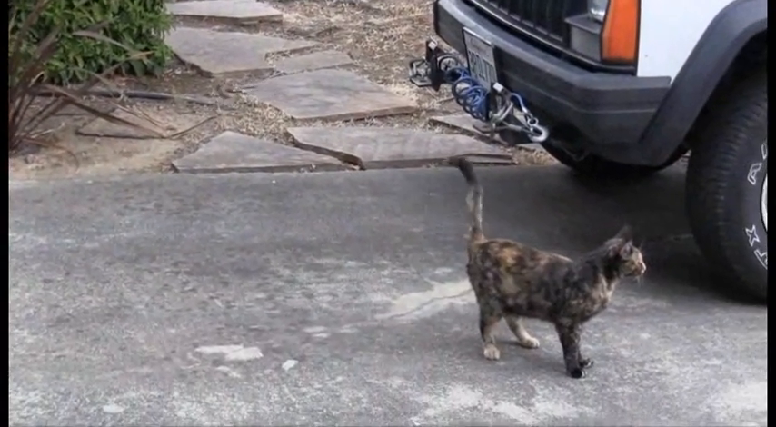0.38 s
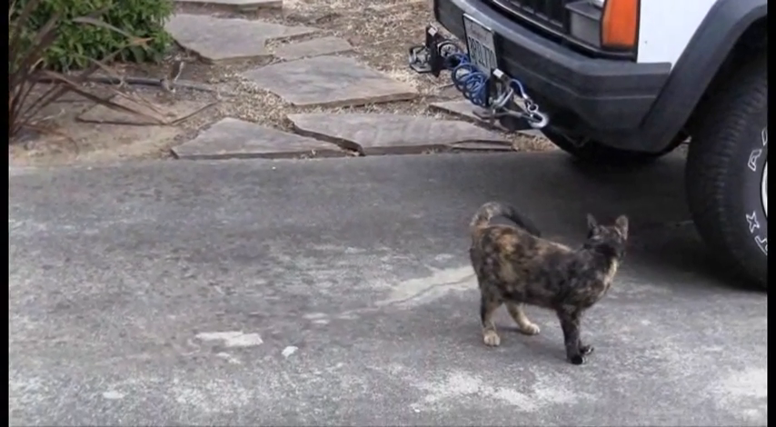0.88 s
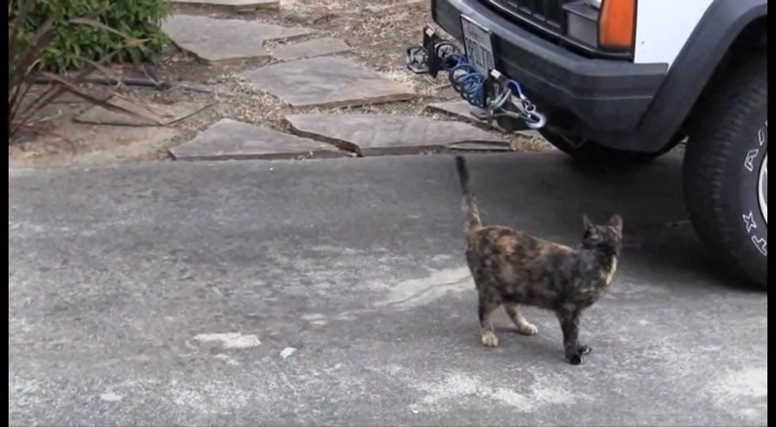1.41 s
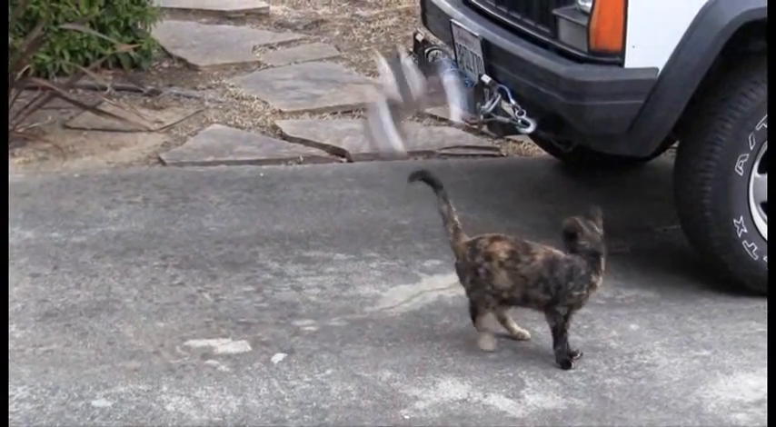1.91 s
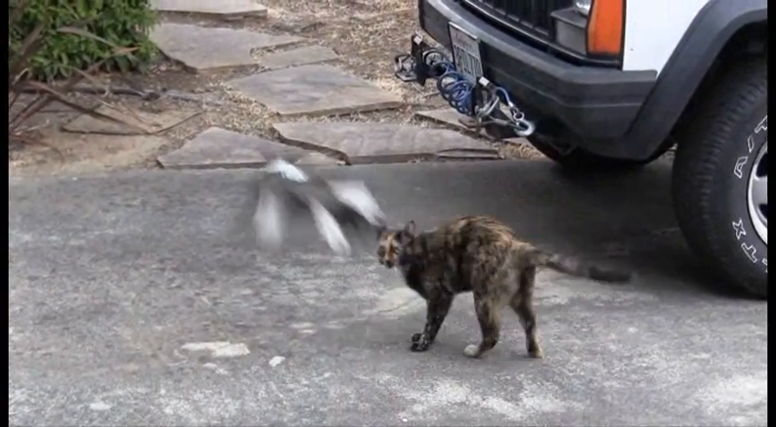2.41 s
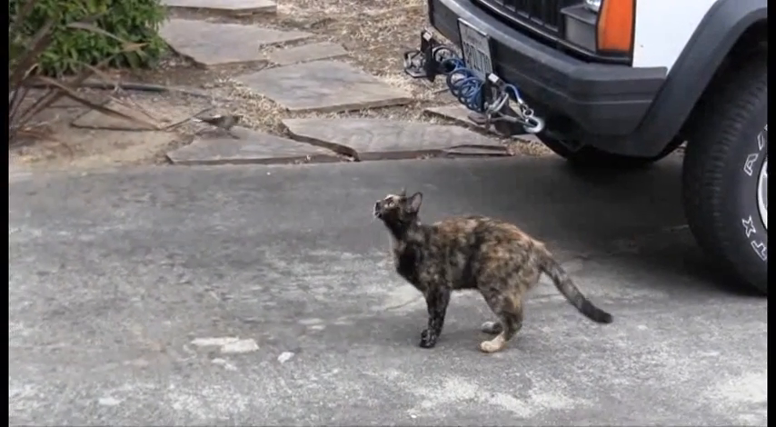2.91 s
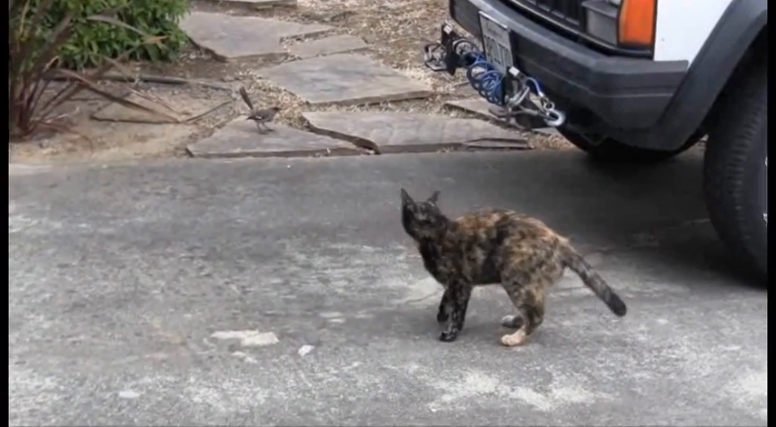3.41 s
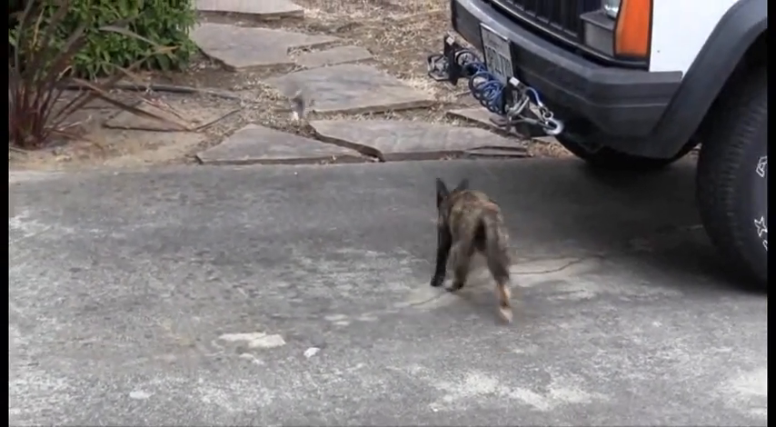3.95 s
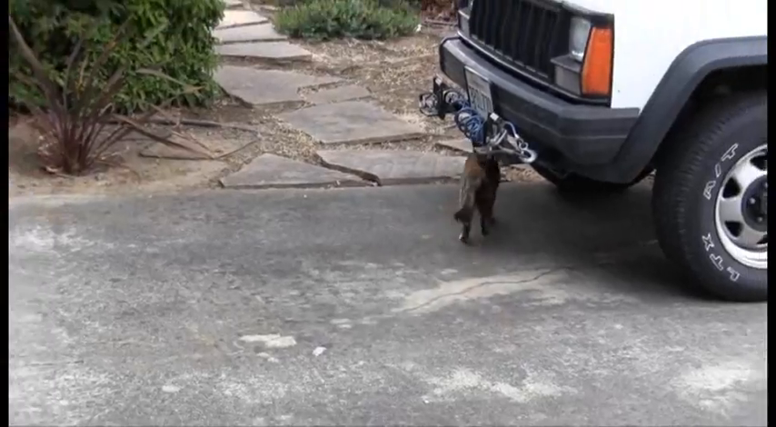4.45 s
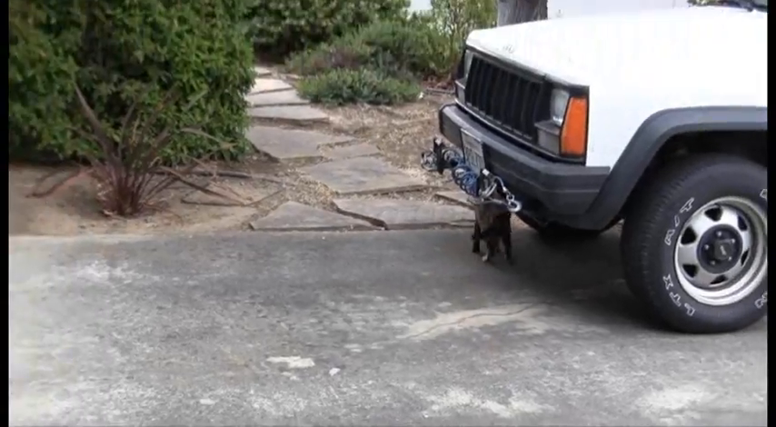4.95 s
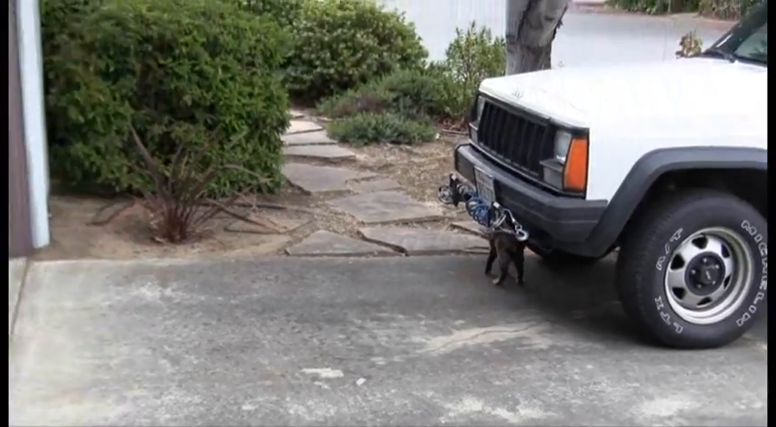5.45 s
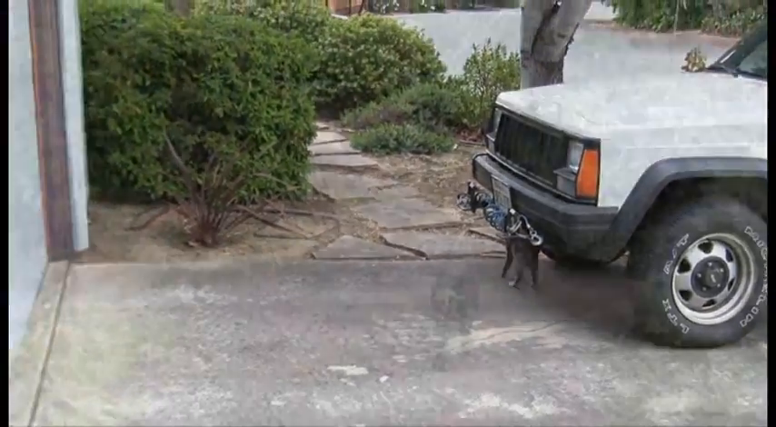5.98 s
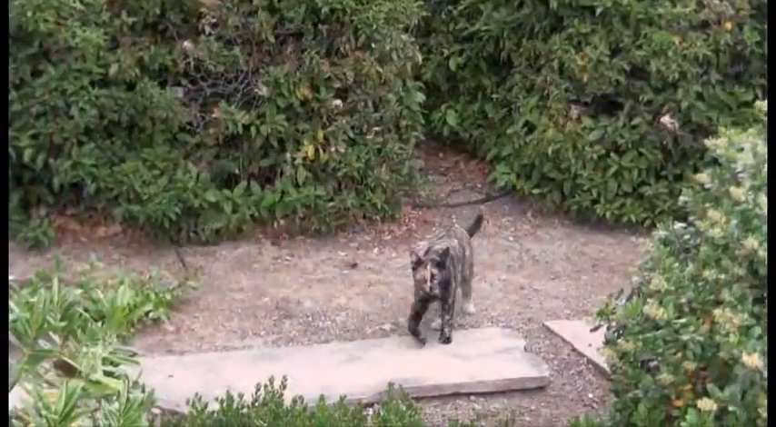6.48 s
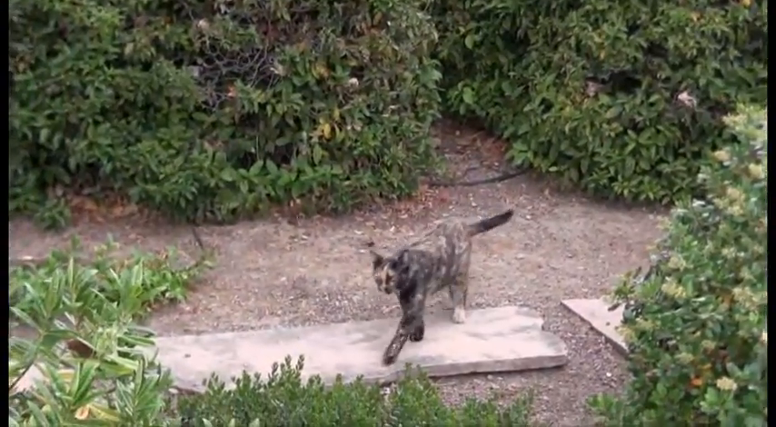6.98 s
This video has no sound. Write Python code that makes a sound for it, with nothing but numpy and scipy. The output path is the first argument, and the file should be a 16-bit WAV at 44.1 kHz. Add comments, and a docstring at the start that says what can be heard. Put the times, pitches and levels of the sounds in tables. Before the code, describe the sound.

Outdoors on a residential driveway, scolding mockingbirds give loud, dry, grating rasps, joined in a run at first, then a brief gap with soft wing flaps before sharper rasps resume. A trembling squeal drops in pitch midway, followed by more rasps that weaken. Distant traffic hums steadily; faint ticks occur, and low wind buffets the stereo microphone at the end. Hard surfaces give short, bright reflections.

```python
"""Harsh rasps of scolding mockingbirds follow and overlap over a far traffic hum; they scold a cat on
a paved drive. Uneven puffs and hiss ring four throat resonances; gliding sines lock inside the rasps.
Wing beats are puffs of noise, ticks are short rings, and one rasp opens with a falling whistled squeal.
Random taps make the echoes of paving, a car body and walls; at the end low noise buffets the two
microphone ports as a gust."""
import sys
import numpy as np
from scipy import signal
from scipy.fft import next_fast_len
from scipy.io import wavfile
from scipy.ndimage import uniform_filter1d

SR = 44100
rng = np.random.default_rng(int(sys.argv[2]) if len(sys.argv) > 2 else 0)


def convert_level_to_amplitude(level_db):
    """Map a level in decibels to its linear amplitude factor."""
    exponent = np.asarray(level_db, float) / 20
    return 10 ** exponent


def inscribe(sig):
    """Save sig as 16-bit PCM at rate SR to the path in sys.argv[1].

    A 1-D sig is mono; a 2-D sig holds one channel per row.
    Samples are clipped to [-1, 1] before scaling.
    """
    pcm = np.round(np.clip(np.atleast_2d(sig).T, -1, 1) * 32767)
    wavfile.write(sys.argv[1], SR, pcm.astype(np.int16))


N = 313551  # length of the scene in samples


def evened(x):
    """Scales a sound to rms 1."""
    return x / np.sqrt(np.mean(x ** 2) + 1e-20)


def read(points, hz):
    """Reads a spectrum table on a log-frequency axis."""
    f, value = np.transpose(points)
    return np.interp(np.log(hz + 1), np.log(f + 1), value)


def add(mix, s, sound):
    """Mixes a sound in at time s, in seconds."""
    part = mix[round(s * SR):][:len(sound)]
    part += sound[:len(part)]


def wander(length, samples):
    """Random wobble of rms 1, smoothed over so many samples."""
    return evened(uniform_filter1d(rng.standard_normal(length), max(int(samples), 1)))


def resonate(x, hz, width_hz, order=2):
    """A moving resonance: shifts the curve hz to zero, smooths, shifts back."""
    turn = np.exp(2j * np.pi * np.cumsum(hz * np.ones(len(x))) / SR)
    r = np.exp(-np.pi * width_hz / SR)
    low = x / turn
    for _ in range(order):
        low = signal.lfilter([1 - r], [1, -r], low)
    return 2 * (turn * low).real


def dulled(x, top_hz):
    """Takes away the treble above top_hz."""
    return signal.sosfilt(signal.butter(3, top_hz, fs=SR, output="sos"), x)


def without_bass(x, order, bottom_hz):
    """Takes away the bass below bottom_hz."""
    return signal.sosfilt(signal.butter(order, bottom_hz, "high", fs=SR, output="sos"), x)


def shaped_noise(gain, size):
    """Noise from random short-time spectra; gain(hz, s) gives the magnitudes."""
    hop = size // 4
    frames = N // hop + 5
    a, b = rng.standard_normal((frames, size // 2 + 1, 2)).T
    hz = np.fft.rfftfreq(size, 1 / SR)[:, None]
    s = (np.arange(frames) * hop / SR)[None]
    spectra = (a + 1j * b) * gain(hz, s)
    return signal.istft(spectra, nperseg=size, noverlap=size - hop)[1][:N]


def swell(start, end, from_hz, to_hz, peak_db):
    """Time, gliding frequency and arched gain of a passing band."""
    t = np.arange(start, end, 1 / SR)
    u = np.linspace(0, 1, len(t))
    arch_db = -9.5 * (2 * u - 1) ** 2  # weaker toward both ends, which also fade to silence
    gain = convert_level_to_amplitude(peak_db + arch_db) * signal.windows.tukey(len(t), .15)
    return t, from_hz + (to_hz - from_hz) * u, gain


# The colour of the hum. Each row: frequency in Hz, relative level in dB.
HUM_COLOUR = [(15, -50), (25, -55), (70, -1.5), (344, -2), (373, -5.5), (734, -7), (1840, -10), (2160, -14),
              (3520, -16.5), (4140, -21.5), (16000, -35.5)]
# How wide the hum is. Each row: frequency in Hz, level of the side against the middle in dB.
HUM_WIDTH = [(40, -28), (90, -39), (180, -10), (550, -11), (1650, -13.5), (5000, -7.5), (15000, -4)]
# How the hum comes and goes. Each row: time in seconds, relative level in dB.
HUM_DRIFT = [(0, 4.6), (5.5, 5), (6.3, 6.5), (7.2, 3.6)]


def hum():
    """Far traffic and air: smooth noise, narrow in the deepest bass and a little stronger at left."""
    def middle_gain(hz, s):
        return convert_level_to_amplitude(read(HUM_COLOUR, hz) + np.interp(s, *np.transpose(HUM_DRIFT)))

    def side_gain(hz, s):
        return middle_gain(hz, s) * convert_level_to_amplitude(read(HUM_WIDTH, hz))

    mid, side = shaped_noise(middle_gain, 2048), shaped_noise(side_gain, 2048)
    level = convert_level_to_amplitude(-47.5) / mid.std()
    return level * np.array([mid + side, mid - side]) * convert_level_to_amplitude(np.array([[.6], [-.6]]))


def syrinx_drive(turns):
    """The voice organ snaps shut about a thousand times a second; hiss weakens from snap to snap."""
    n = len(turns)
    # each closure comes a little early or late
    uneven_turns = np.floor(turns + .035 * wander(n, 30))
    snaps = np.diff(np.maximum.accumulate(uneven_turns), prepend=0) > 0
    strong_weak = 1 + 0.42 * np.cos(np.pi * np.cumsum(snaps))  # alternate closures give half-pitch lines
    snaps = snaps * strong_weak * convert_level_to_amplitude(2.0 * rng.standard_normal(n))
    # hiss is strongest just after each snap and weakens until the next
    hiss = (0.29 + np.exp(-(turns % 1) / 1.55)) * rng.standard_normal(n)
    blend = .55 * evened(snaps - snaps.mean()) + .65 * evened(hiss)
    return blend * convert_level_to_amplitude(1.2 * wander(n, 250))


# Widths in Hz of the low, main, upper and top throat resonance.
THROAT_WIDTHS_HZ = (1000, 1020, 1570, 2600)
# Each of the four resonances falls away above its own limit, in Hz.
THROAT_LIMITS_HZ = (4050, 6900, 9850, 14600)


def throat_ring(drive, centres_hz, levels_db):
    """Four resonances ring side by side, and a side cavity swallows one band."""
    throat = 0
    bands = zip(centres_hz, THROAT_WIDTHS_HZ, levels_db, THROAT_LIMITS_HZ)
    for k, (hz, width_hz, db, limit_hz) in enumerate(bands):
        ring = dulled(resonate(drive, hz, width_hz, order=1 + k // 3), limit_hz)
        # neighbours alternate in sign, as in a tube, so the gaps between them stay filled
        throat = throat + (-1) ** k * convert_level_to_amplitude(db) * evened(ring)
    return throat - 0.48 * resonate(throat, 3715, 500, order=1)


def strands(drive, centres_hz, levels_db):
    """Narrow strands flare and fade inside the low, main and upper resonance."""
    n, out = len(drive), 0
    for centre_hz, db, trim_db in zip(centres_hz, levels_db, (-11.5, -9.5, -10.5)):
        for shift_hz in (-350, 0, 380):
            line = resonate(drive, centre_hz + shift_hz + 90 * wander(n, 2380), 115)
            out = out + convert_level_to_amplitude(db + trim_db + 2.9 * wander(n, 900)) * evened(line)
    return out


def syrinx_tone(drive, turns, pitch, tone_db, ragged):
    """The hum of the voice organ itself, which slips out of step and grows fuzz when ragged."""
    n = len(turns)
    slip = np.cumsum(.06 * ragged * wander(n, 200) * pitch) / SR
    flicker_db = (1.5 + 2.5 * ragged) * wander(n, 400)
    tone = np.sin(2 * np.pi * (turns + slip)) * convert_level_to_amplitude(tone_db + flicker_db)
    fuzz = evened(resonate(drive, 1.45 * pitch, 510))  # nearly half a pitch above the tone
    return tone + convert_level_to_amplitude(tone_db - 6.5 + 8.2 * ragged) * fuzz


def rasp(rows, tone_against_effort_db, low_from_hz, low_to_hz, low_db, upper_hz, ragged):
    """One stretch of scolding: a chaotic voice organ rings the throat and adds its own tone."""
    attack_s, release_s = .014, .016
    s, *columns = np.transpose(rows)
    t = np.arange(s[0], s[-1] + release_s / 2, 1 / SR)
    effort_db, pitch, main_hz, top_db = (np.interp(t, s, c) for c in columns)

    low_hz = np.linspace(low_from_hz, low_to_hz, len(t))
    low_db = low_db + 4.5 * np.exp(-(t - s[0]) / 0.012)  # the low resonance speaks first
    upper_hz = upper_hz + low_hz - low_hz.mean()  # the upper one moves along with the low one
    upper_db = -1 + 0.59 * np.maximum(top_db, -32)  # and takes a share of the brightness
    centres_hz = (low_hz, main_hz, upper_hz, 1.623 * upper_hz)
    levels_db = (low_db, 0, upper_db, top_db)

    turns = np.cumsum(pitch * (1 + .02 * wander(len(t), 150))) / SR
    drive = syrinx_drive(turns)
    throat = throat_ring(drive, centres_hz, levels_db)
    throat = without_bass(throat, 4, 1.91 * np.median(pitch))  # a small body radiates little bass
    throat = throat + strands(drive, centres_hz[:3], levels_db[:3])

    # the tone gives out toward the end of a stretch
    fade_db = -5 * ((t - s[0]) / (s[-1] - s[0])) ** 4
    tone = syrinx_tone(drive, turns, pitch, effort_db + tone_against_effort_db + fade_db, ragged)
    octave_db = effort_db + low_db - 20 + 5.6 * wander(len(t), 205.4)
    octave = np.sin(4 * np.pi * turns) * convert_level_to_amplitude(octave_db)

    edge = np.minimum((t - s[0]) / attack_s, (t[-1] - t) / release_s)
    edge = np.clip(edge, 0, 1) ** .7
    return s[0], edge * (convert_level_to_amplitude(effort_db - 2.5) * throat + np.sqrt(2) * (tone + octave))


# One curve for each stretch of scolding; neighbouring stretches often join where the rasp changes
# abruptly. Each row: time in seconds, effort in dB, pitch of the voice organ in Hz, main throat
# resonance in Hz, brightness in dB (higher when the beak points at the microphone).
STRETCHES = [
    [(0.072, -24, 1000, 4500, -25), (0.084, -29, 967, 4840, -24), (0.232, -27.5, 944, 4550, -20),
     (0.332, -25, 1024, 4570, -18)],
    [(0.326, -25, 1030, 5000, -14), (0.378, -22, 1007, 4700, -15), (0.55, -23.5, 1020, 4880, -11),
     (0.703, -27, 1007, 5310, -10)],
    [(0.697, -28, 996, 5080, -14), (0.769, -25.5, 994, 5150, -11.5), (0.929, -27, 881, 5010, -13),
     (0.973, -27, 832, 5200, -18)],
    [(0.967, -25.5, 899, 4860, -15), (1.001, -25, 987, 4930, -15), (1.09, -24, 956, 4900, -17.5)],
    [(1.084, -28.5, 944, 4440, -23), (1.246, -26, 1040, 4790, -14.5), (1.366, -24.5, 991, 4670, -14.5),
     (1.452, -28, 944, 4720, -18)],
    [(2.025, -27.5, 964, 5520, -9), (2.061, -21, 929, 5480, -10), (2.11, -21.5, 850, 5560, -8.5),
     (2.165, -25, 833.4, 5680, -9.5), (2.269, -24.5, 969, 4630, -14), (2.313, -24.5, 878, 4500, -19),
     (2.385, -23, 901, 4560, -21)],
    [(2.696, -32, 1304, 4940, -2), (2.716, -22.5, 1243, 4940, -7.5), (2.868, -22, 1155, 4930, -7),
     (2.902, -21.5, 1072, 4980, -8), (3.22, -23.5, 889.4, 4690, -17.5), (3.35, -23.5, 850, 4687, -21.5)],
    [(3.899, -30, 969, 4930, -14), (3.967, -27.5, 1053, 4960, -10.5), (4.143, -29.5, 977, 5120, -15.5),
     (4.17, -27.5, 1000, 5040, -12.5), (4.349, -28, 982.5, 4980, -15.5), (4.46, -36, 898, 5050, -14)],
    [(4.566, -33.5, 900, 5260, -6), (4.778, -27.5, 1043, 4530, -15), (4.9, -28, 1011, 4000, -14.5),
     (4.93, -33, 954, 4640, -9), (5.016, -32.5, 962, 5330, -14), (5.048, -42, 912, 4940, -8)],
    [(5.058, -33, 935, 4600, -22), (5.108, -30, 950, 4570, -20.5), (5.186, -24.5, 989, 4700, -18.5),
     (5.422, -24.5, 1008, 4820, -18), (5.536, -35.5, 904, 4980, -13), (5.612, -36.5, 934, 5150, -15)],
    [(5.62, -32, 979, 4800, -23), (5.654, -33.5, 940, 4640, -39), (5.746, -31.5, 974, 4360, -19.5),
     (5.894, -28.5, 953, 4740, -17), (6.158, -34, 800, 5084, -12)],
    [(6.152, -39, 1000, 4170, -30), (6.196, -37.5, 971, 4380, -44), (6.394, -35, 1023, 4560, -37),
     (6.48, -34.5, 1014, 4430, -25), (6.57, -35, 950, 4670, -33)],
]
# The throat and tone settings of each stretch. Each row: tone of the voice organ against the effort in
# dB, low resonance at the start in Hz, at the end in Hz, its level against the main one in dB, mean
# upper resonance in Hz.
VOICES = [(-18, 2300, 1500, -7, 6950), (-19, 2650, 2850, -5.5, 7750), (-20, 2320, 2620, -8.5, 7400),
          (-23, 2100, 2440, -5, 7480), (-24, 3000, 2400, -4.5, 7020), (-22, 2650, 2700, -5, 7200),
          (-23.5, 3250, 2430, -5.5, 7600), (-28, 2840, 2590, -3.5, 7400), (-33, 2710, 2750, -2, 7200),
          (-28.5, 2230, 2490, -4.5, 6850), (-25.5, 2580, 2790, -5, 6800), (-13.5, 2470, 2880, -5, 7400)]
# How far the tone of each stretch breaks up, from 0 (steady) to 1 (ragged).
RAGGED = [.15, .1, .15, .5, .5, .7, .8, .6, .6, .5, .5, .05]


def scolding():
    """All the rasps, stretch by stretch, each stretch with its own throat and tone settings."""
    out = np.zeros(N)
    for rows, voice, ragged in zip(STRETCHES, VOICES, RAGGED):
        add(out, *rasp(rows, *voice, ragged))
    return out


# Fuzzy partials that lock for a moment inside a rasp. Each row: start in seconds, end in seconds,
# first frequency in Hz, last frequency in Hz, level at the middle of the swell in dB.
LOCKED = [(0.08, .28, 1980, 2450, -33), (0.25, .43, 2500, 2580, -28), (0.2, .9, 1340, 1330, -47),
          (0.22, .5, 4420, 4520, -27.5), (0.36, .61, 3020, 3130, -33), (0.38, .59, 2200, 2180, -34),
          (0.97, 1.2, 2300, 2400, -33), (0.97, 1.4, 1980, 1960, -38), (1.18, 1.44, 2450, 2600, -32),
          (1.2, 1.45, 4800, 4720, -25), (1.1, 1.4, 4350, 4450, -29), (2.215, 2.25, 4750, 4470, -23),
          (2.262, 2.298, 4900, 4490, -23), (2.305, 2.34, 4750, 4560, -28), (2.348, 2.386, 4800, 4470, -23),
          (2.12, 2.2, 2700, 2720, -30), (2.06, 2.16, 5700, 6500, -27), (2.71, 2.95, 3500, 3350, -32),
          (2.74, 3.08, 3080, 2950, -31), (2.92, 3.34, 1980, 2050, -36), (2.95, 3.34, 2350, 2480, -33),
          (3.9, 4.1, 2890, 2930, -31), (5.07, 5.14, 2200, 2270, -34), (5.06, 5.4, 1930, 2000, -40),
          (5.62, 5.85, 1980, 1880, -44), (5.68, 6.05, 2200, 2520, -38), (2.05, 2.37, 1720, 1700, -38),
          (6.15, 6.55, 2330, 2600, -42), (6.14, 6.58, 1980, 2040, -46), (6.14, 6.58, 4380, 4450, -41)]


def locked_partials():
    """Near sines that glide while their pitch and strength shiver."""
    out = np.zeros(N)
    for row in LOCKED:
        t, hz, gain = swell(*row)
        turns = np.cumsum(hz * (1 + 0.025 * wander(len(t), 121))) / SR
        shiver = convert_level_to_amplitude(1.9 * wander(len(t), 289.5))
        add(out, row[0], np.sqrt(2) * gain * shiver * np.sin(2 * np.pi * turns))
    return out


def near_echoes(x):
    """Paving and car body return a short, dense cluster, a little different at each port."""
    t = np.arange(2600) / SR
    cluster = rng.standard_normal((3, len(t))) * convert_level_to_amplitude(-60 * t / 0.19) * (t > .002)
    # both ports share the first noise; each adds one of its own
    cluster = (cluster[0] + 0.59 * cluster[1:]) / np.linalg.norm(cluster[0])
    bright = without_bass(x, 2, 1600)  # small faces return little bass
    return signal.fftconvolve(bright[None], cluster, axes=1)[:, :N]


# How long the walls ring. Each row: frequency in Hz, time to fall by 60 dB in seconds.
WALLS = [(1000, 0.14), (3000, 0.88), (5000, 0.69), (9000, 0.65), (14000, 0.17)]


def walls(x):
    """Sparse taps of random sign, each band dying at its own speed."""
    taps = np.zeros((2, SR))
    at = np.arange(300, SR - 20, 20) + rng.integers(0, 20, (2, (SR - 301) // 20))
    np.put_along_axis(taps, at, rng.choice([-1., 1.], at.shape), 1)
    hz, t, z = signal.stft(taps, SR, nperseg=256)
    dying = convert_level_to_amplitude(-60 * t / read(WALLS, hz)[:, None])
    tail = signal.istft(z * dying, SR, nperseg=256)[1]
    return signal.fftconvolve(x[None], tail / np.linalg.norm(tail[0]), axes=1)[:, :N]


# Soft wing beats. Each row: start in seconds, relative level in dB, length in seconds.
WINGS = [(1.83, -58, 0.027), (1.982, -51.5, 0.052), (2.47, -51, .015), (2.523, -52.5, 0.042),
         (2.587, -76, .015), (2.61, -51.5, .025), (3.492, -52.5, 0.05)]


def wing_beats():
    """Feathers swish as bright puffs of noise."""
    out = np.zeros(N)
    for s, db, length_s in WINGS:
        bright = np.convolve(rng.standard_normal(4000), [1, -.6])
        puff = dulled(bright, 11000)[:round(length_s * SR)]
        add(out, s, convert_level_to_amplitude(db) * puff * signal.windows.tukey(len(puff), .4))
    return out


# Dull ticks nearby. Each row: start in seconds, relative level in dB, ring frequency in Hz.
TICKS = [(3.24, -26, 630), (3.858, -56, 826), (5.241, -15, 764), (6.841, -38, 1280)]


def ticks():
    """Two partials that die within a couple of cycles; their slope is what sounds."""
    out, t = np.zeros(N), np.arange(600) / SR
    for s, db, hz in TICKS:
        ring = np.sin(2 * np.pi * hz * t) + 0.46 * np.sin(2 * np.pi * 2.37 * hz * t)
        slope = np.gradient(ring * np.exp(-t * hz / 0.83)) * SR
        add(out, s, convert_level_to_amplitude(db) * slope / (2 * np.pi * 1.07 * hz))
    return out


# The strength of the squeal. Each row: time in seconds, effort in dB.
SQUEAL = [(4.503, -41), (4.543, -24), (4.561, -13.5), (4.571, -19), (4.665, -25.5), (4.68, -22.5),
          (4.8, -36), (4.9, -33.5), (4.95, -51)]
# What the throat lets through of each partial. Each row: frequency in Hz, gain in dB.
SQUEAL_THROAT = [(1000, -20.5), (1450, -9), (2100, -1), (2400, 2.5), (2750, 0.5), (3200, -10.5),
                 (4200, -16.5), (4500, -20)]
# The beak opens during the squeal and lifts a bright band. The one row: start in seconds, end in
# seconds, first frequency in Hz, last frequency in Hz, level at the middle of the swell in dB.
BEAK = (4.66, 4.96, 2400, 5400, -24)


def squeal():
    """A trembling whistle that climbs briefly, then sinks and grows less steady."""
    top_s, top_hz, rest_hz = 4.548, 2257, 940
    climb_hz, sink_s, rough = 282, .118, .29
    start = SQUEAL[0][0]
    t = np.arange(start, BEAK[1], 1 / SR)
    after = t - top_s
    sink = rest_hz + (top_hz - rest_hz) * np.exp(-np.maximum(after, 0) / sink_s)
    pitch = sink - climb_hz * np.minimum(after / (top_s - start), 0) ** 2

    unsteady = .07 * (1.25 - pitch / top_hz) * wander(len(t), 105)
    turns = np.cumsum(pitch * (1 + unsteady)) / SR
    tremble = 1 + rough * (np.cos(2 * np.pi * 115 * (t - 4.57)) + 0.43 * wander(len(t), 80))
    tone = sum(convert_level_to_amplitude(read(SQUEAL_THROAT, k * pitch)) * np.sin(2 * np.pi * k * turns) for k in (1, 2))
    effort = convert_level_to_amplitude(np.interp(t, *np.transpose(SQUEAL)))
    whistle = np.sqrt(2) * effort * tone * tremble * signal.windows.tukey(len(t), .03)

    _, beak_hz, gain = swell(*BEAK)
    stack = sum(np.cos(2 * np.pi * k * turns) for k in range(2, 7))
    stack = stack + 13.0 * rng.standard_normal(len(t))
    n = len(gain)
    whistle[-n:] += gain * evened(resonate(stack[-n:], beak_hz, 1330))
    out = np.zeros(N)
    add(out, start, whistle)
    return out


# The buffets of the gust. Each row: time of the middle in seconds, lift above the rising wind in dB.
BUFFETS = [(6.36, 2.3), (6.51, 5.5), (6.65, 10), (6.8, 4.9), (7.03, 6.4)]


def gust():
    """Lumpy low pressure that reaches the two ports far out of step, the left harder."""
    def low_gain(hz, s):
        return hz / 60 / (1 + (hz / 80) ** 2.93) + 0 * s

    lumps = evened(shaped_noise(low_gain, 2048))
    t = np.arange(N) / SR
    rise_db = 17.5 * np.maximum(t - 5.76, 0)  # dB per second, from that moment on
    level_db = -71 + rise_db + 1.4 * wander(N, 1300)
    for s, db in BUFFETS:
        level_db = level_db + db * np.exp(-((t - s) / 0.068) ** 2)
    # the imaginary part is the same pressure a quarter cycle out of step
    both = signal.hilbert(convert_level_to_amplitude(level_db) * lumps, next_fast_len(N))[:N]
    side = 1.7 * both.imag + .4 * both.real
    return np.array([both.real + side, both.real - side])


def scene():
    """Birds and ticks a little left of centre, with their echoes, over hum and wind."""
    near = scolding() + locked_partials() + wing_beats() + ticks() + squeal()
    direct = near * convert_level_to_amplitude(np.array([[.8], [-.9]]))
    echoes = convert_level_to_amplitude(-7.0) * near_echoes(near) + convert_level_to_amplitude(-24) * walls(near)
    return hum() + direct + echoes + gust()


def roll_off(x):
    """The treble ends steeply here."""
    return signal.sosfilt(signal.butter(12, 16050, fs=SR, output="sos"), x)


def record(dry):
    """Stores the finished mix."""
    return roll_off(dry)


dry = scene()
out = record(dry)
inscribe(out)
```